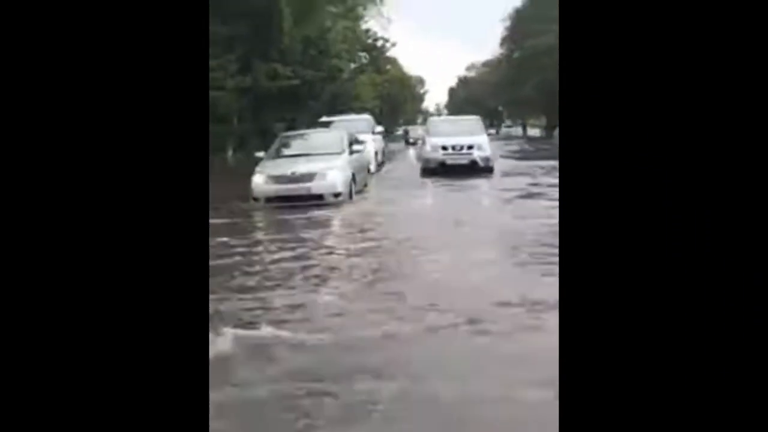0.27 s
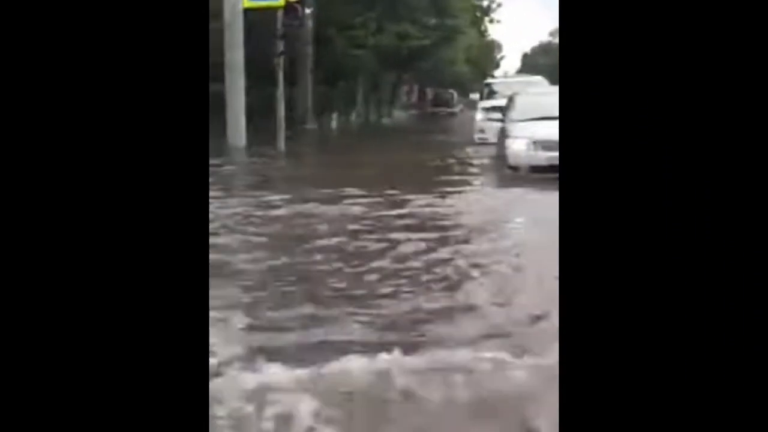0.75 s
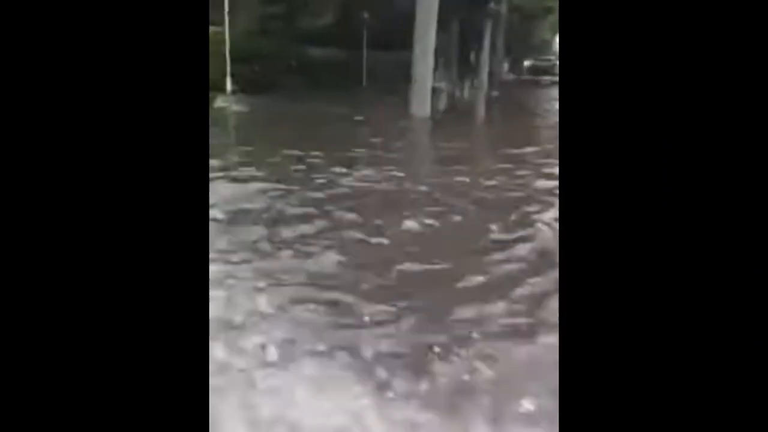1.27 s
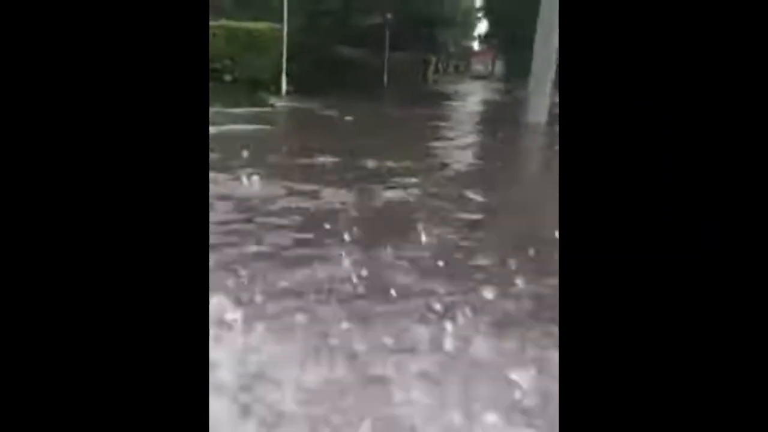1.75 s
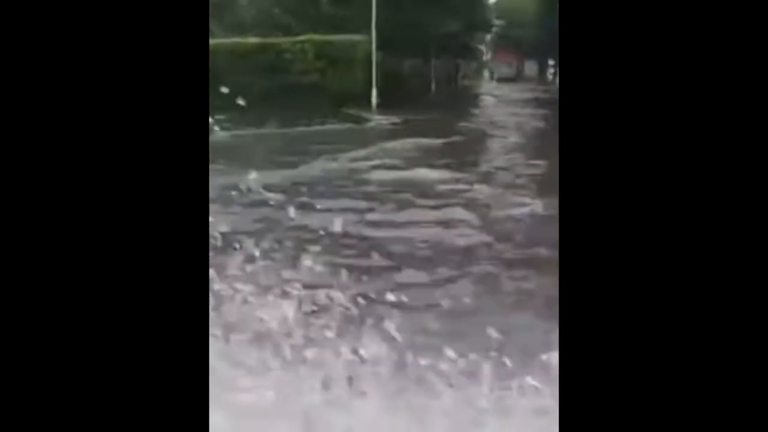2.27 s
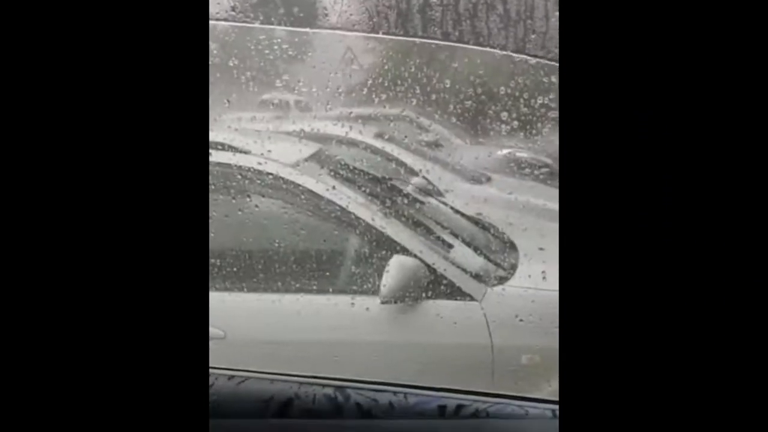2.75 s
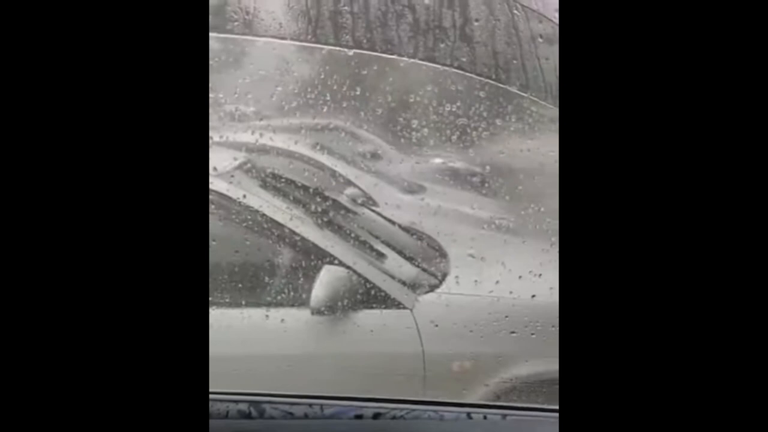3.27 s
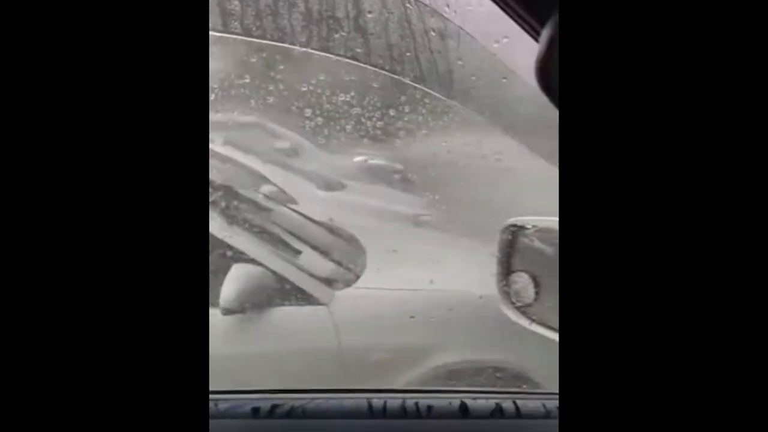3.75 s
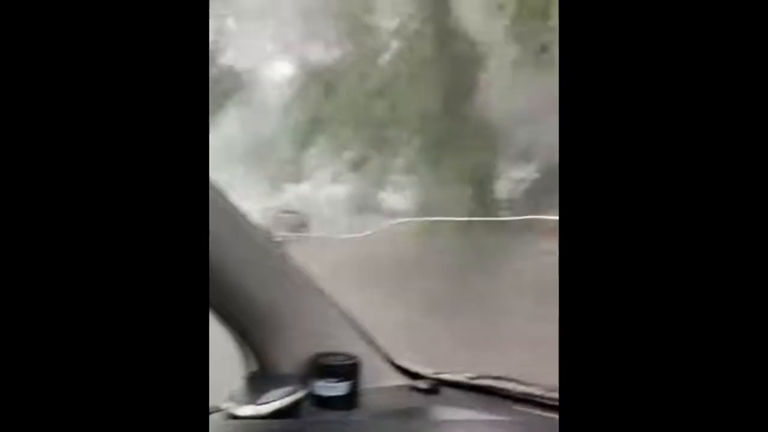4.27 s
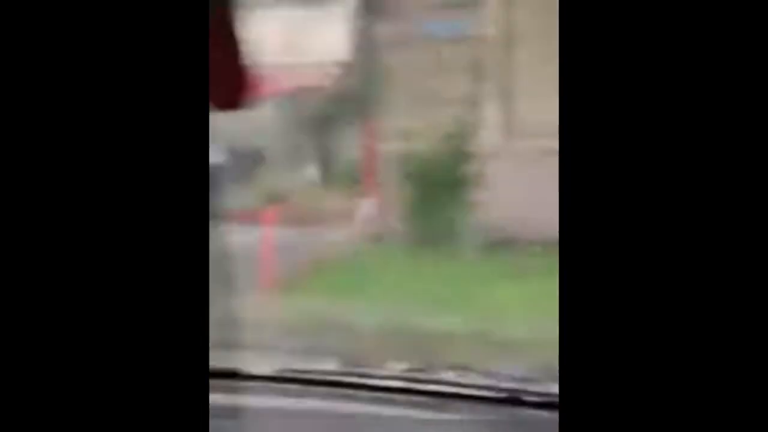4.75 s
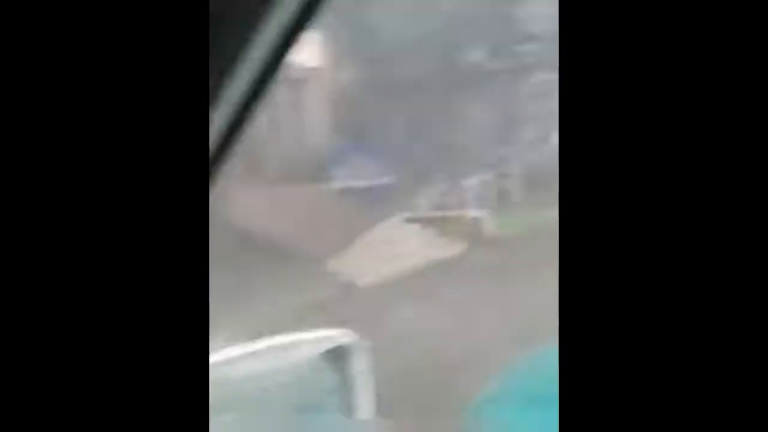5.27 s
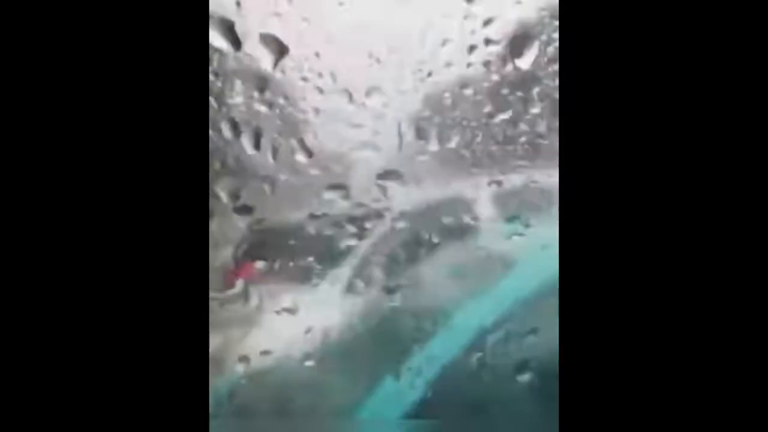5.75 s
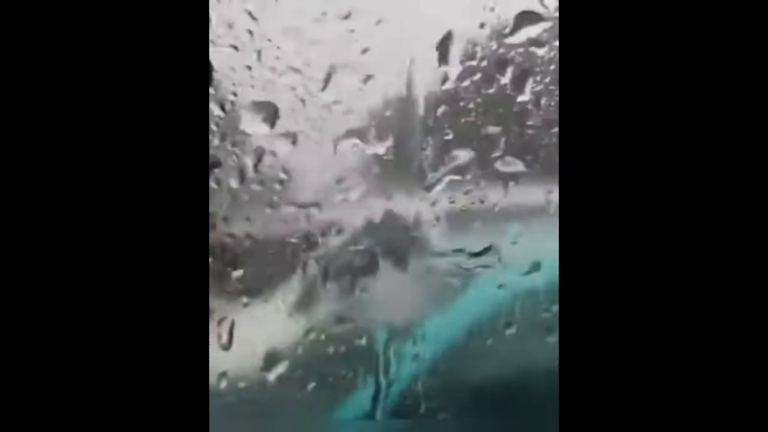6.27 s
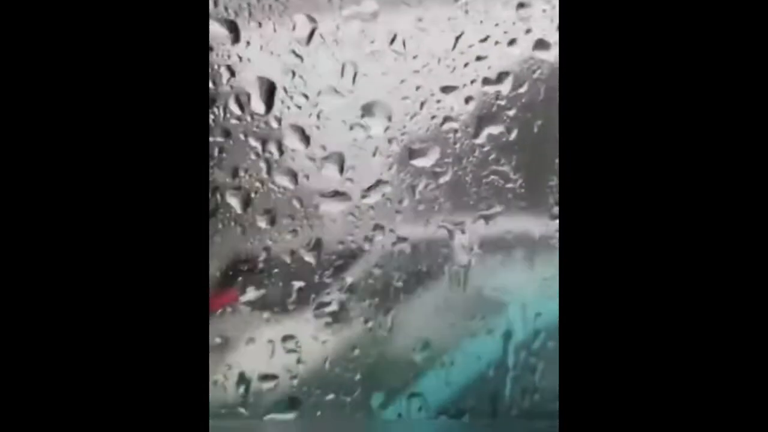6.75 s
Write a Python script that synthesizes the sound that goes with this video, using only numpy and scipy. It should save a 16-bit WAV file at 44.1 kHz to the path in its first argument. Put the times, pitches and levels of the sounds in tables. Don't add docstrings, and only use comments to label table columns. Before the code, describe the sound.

A car wades noisily through floodwater with low gusty thuds and spray, then suddenly soft dense rain hisses and drums around a car cabin.

```python
import sys
import numpy as np
from scipy import signal
from scipy.fft import rfft, irfft, dct, next_fast_len
from scipy.io import wavfile

SR = 44100
rng = np.random.default_rng(int(sys.argv[2]) if len(sys.argv) > 2 else 0)


def materialize(psi):
    bounded = np.clip(np.atleast_2d(psi).T, -1, 1)
    quanta = np.round(bounded * 32767).astype(np.int16)
    wavfile.write(sys.argv[1], SR, quanta)


def makeup_ratio(level_db):
    decades = np.asarray(level_db, float) / 20
    return 10 ** decades


N = 309141
SIZE = next_fast_len(N)
HZ = np.maximum(np.arange(SIZE // 2 + 1) * SR / SIZE, 1)
TIME = np.arange(N) / SR
CUT_S = 2.4108

# (time [s], peak level [dB], pitch [Hz])
THUMPS = [(0.045, -11, 107), (0.211, -15, 92), (0.315, -8, 137), (0.425, -2, 141), (0.509, -7, 245),
          (0.59, -4, 188), (0.609, -13, 134), (0.677, -9, 152), (0.706, -2.5, 159), (0.72, -16, 131),
          (0.767, -8, 164), (0.843, -10, 122), (0.873, -5, 134), (0.95, -6.5, 136), (0.97, -9.5, 156),
          (1.061, -6, 108), (1.08, -4, 177), (1.153, -5.5, 199), (1.22, -5, 164), (1.313, -9, 138),
          (1.387, -5.5, 125), (1.527, -8.5, 116), (1.648, -12, 283), (1.784, -5.5, 126), (1.867, -5.5, 185),
          (1.999, -15, 151), (2.225, -6, 127), (2.3, -5.5, 222), (2.39, -20, 170)]


def rms_one(x):
    return x / np.sqrt(np.mean(x ** 2) + 1e-20)


def in_time(rows):
    s, *columns = np.transpose(rows)
    return [np.interp(TIME, s, c) for c in columns]


def at_hz(points):
    hz, value = np.transpose(points)
    return np.interp(np.log(HZ), np.log(hz), value)


def stepped(edges, levels):
    corners = np.ravel([(a + 1, b) for a, b in zip(edges, edges[1:])])
    return np.interp(HZ, corners, np.ravel(levels), left=-200, right=-200)


def bumps(times, heights, width_s):
    coarse = TIME[::32]
    bells = np.exp(-0.5 * ((coarse[:, None] - np.asarray(times)) / width_s) ** 2)
    return np.interp(TIME, coarse, bells @ np.asarray(heights))


def drift(rate):
    r = np.exp(-80 * np.pi * rate / SR)
    chance = rng.standard_normal(N // 40 + 2002)
    slow = signal.lfilter([1], [1, -2 * r, r * r], chance)[2000:]
    return np.interp(np.arange(N) / 40, np.arange(len(slow)), rms_one(slow))


def droplets(per_s, spread_db, share):
    sizes = makeup_ratio(spread_db * np.minimum(rng.exponential(1, N), 5)) * rng.choice([-1, 1], N)
    clicks = rms_one(sizes * (rng.random(N) < per_s / SR))
    share = np.clip(share, 0, 1)
    return np.sqrt(share) * clicks + np.sqrt(1 - share) * rng.standard_normal(N)


def patches(spectra, low_hz, high_hz, count, shared_db, own_db, rate):
    edges = np.geomspace(low_hz, high_hz, count + 1)
    band = np.clip(np.searchsorted(edges, HZ), 1, count)
    together, out = drift(rate), 0
    for k in range(1, count + 1):
        flicker = makeup_ratio(shared_db * together + own_db * drift(rate))
        out = out + flicker * irfft(spectra * (band == k), SIZE)[..., :N]
    return rms_one(out)


def ring(clicks, hz, t60):
    r, w = makeup_ratio(-60 / (t60 * SR)), 2 * np.pi * hz / SR
    return signal.lfilter([0, np.sin(w)], [1, -2 * r * np.cos(w), r * r], clicks + 1e-18)


def wade_levels():
    # (time [s], height over the start [dB], depth of churn [dB])
    bow = [
        (0.0, 0, -0.5),
        (0.35, -0.5, 0),
        (0.75, -2, 0.9),
        (1.15, -1.5, -0.7),
        (1.5, 0.6, 1),
        (1.75, 3, -0.2),
        (2.1, 2.5, -0.7),
        (2.41, -1.5, -0.6),
    ]
    # (time [s], level over the steady spray [dB])
    splashes = [(0.07, 3), (0.3, 0.5), (0.84, 5.5), (0.93, 2), (1.03, 3), (1.3, 3.5), (1.38, 0.5),
                (1.53, 1.5), (1.64, 2.5), (1.69, 2.5), (1.83, -1), (1.96, 3.5), (2.09, 2.5), (2.2, 4),
                (2.3, 3), (2.38, 4.5)]
    bow_db, depth_db = in_time(bow)
    splash_db = bumps(*np.transpose(splashes), width_s=0.018)
    s, peak_db, _ = np.transpose(THUMPS)
    lull_db = -19.5 - 0.8 * TIME
    swell = bumps(s + 0.015, makeup_ratio(2 * (peak_db - 12.5)), width_s=0.026)
    wind_db = 10 * np.log10(makeup_ratio(2 * lull_db) + swell)
    churn_db = -20 + depth_db + 0.32 * splash_db + 0.33 * (wind_db - lull_db)
    spray_db = -25.5 + bow_db + splash_db
    mist_db = -41.8 + 1.4 * bow_db + 0.8 * splash_db
    fine_db = -64 + 3 * bow_db + splash_db
    return wind_db, churn_db, spray_db, mist_db, fine_db


def wind(level_db):
    # (frequency [Hz], density [dB])
    turbulence = [(15, -50), (25, -69), (43, -60), (81, 1), (129, 3.5), (330, -5), (430, -23), (730, -120)]
    noise = rfft(rng.standard_normal(N), SIZE) * makeup_ratio(at_hz(turbulence))
    out = makeup_ratio(level_db - 3.0) * patches(noise, 44, 400, count=3, shared_db=2.0, own_db=3.0, rate=60)
    for (s, peak_db, hz), turn in zip(THUMPS, rng.random(len(THUMPS))):
        cycles = np.arange(int(1.6 * SR / hz)) * hz / SR
        at = round(s * SR)
        eddy = np.hanning(len(cycles)) * np.cos(2 * np.pi * (cycles + turn))
        out[at:at + len(cycles)] += makeup_ratio(peak_db + 1.5) * eddy
    return signal.sosfilt(signal.butter(6, 66, "high", fs=SR, output="sos"), out)


def bubbles(per_s, cycles):
    born = droplets(per_s, spread_db=1.5, share=0.96)
    pitches, dealt = np.geomspace(300, 1900, 14), rng.integers(0, 14, N)
    out = 0
    for k, hz in enumerate(pitches):
        out = out + ring(born * (dealt == k), hz, cycles / hz) * np.sqrt(hz)
    return rms_one(out)


def wade():
    # (frequency [Hz], density [dB])
    churn_shape = [(160, 0), (280, 0), (832, -6), (1170, -12), (1610, -9.5), (1900, -16.5), (2470, -54),
                   (4180, -120)]
    spray_edges = [1700, 4750, 6120, 7670, 8520, 10050, 11590]
    # (level at lower edge [dB], level at upper edge [dB])
    spray_bands = [(-4, -3.5), (-12, -10), (-2.5, -0.8), (-5, -7), (-31, -31.5), (-38, -38)]
    mist_edges = [11590, 12920, 13950, 15680]
    # (level at lower edge [dB], level at upper edge [dB])
    mist_bands = [(-1, -5), (.2, -1.5), (-22, -20)]
    # (time [s], level [dB])
    sloshes = [
        (2.0, -33),
        (2.08, -30),
        (2.21, -29),
    ]

    wind_db, churn_db, spray_db, mist_db, fine_db = wade_levels()
    gusts = wind(wind_db)
    froth = 0.5 * bubbles(per_s=900, cycles=12.4) + 0.97 * rng.standard_normal(N)
    churn = patches(rfft(froth, SIZE) * makeup_ratio(at_hz(churn_shape)), 250, 2200,
                    count=5, shared_db=-0.06, own_db=0.3, rate=29.0)
    drops = rfft(droplets(per_s=5000, spread_db=2.5, share=0.22) * makeup_ratio(0.83 * drift(41)), SIZE)
    spray = patches(drops * makeup_ratio(stepped(spray_edges, spray_bands)), 1700, 11590,
                    count=6, shared_db=0.47, own_db=0.5, rate=36)
    mist = patches(drops * makeup_ratio(stepped(mist_edges, mist_bands)), 9500, 15400,
                   count=3, shared_db=1.0, own_db=0.0, rate=12)
    fine_shape = makeup_ratio(stepped(spray_edges[4:], [(3, -1.0), (0.0, -7.0)]))
    fine = rms_one(irfft(drops * fine_shape, SIZE)[:N])

    release = np.exp(-1 / (0.036 * SR))
    duck = 1 / (1 + 1.32 * signal.lfilter([1 - release], [1, -release], np.abs(gusts)))
    water = makeup_ratio(churn_db) * churn
    water = water + duck * (makeup_ratio(spray_db) * spray + makeup_ratio(mist_db) * mist + makeup_ratio(fine_db) * fine)
    s, slosh_db = np.transpose(sloshes)
    water = water + bumps(s, makeup_ratio(slosh_db), width_s=0.044) * rms_one(ring(froth, 1670, 0.0079))
    opening = np.clip(0.69 + TIME / 0.074, 0, 1)
    return (gusts + water) * (TIME < CUT_S) * opening


def two_ports(per_s, spread_db, share):
    # (frequency [Hz], likeness [0-1])
    likeness = [(90, 0.06), (130, 0.6), (180, 0.82), (430, 0.67), (600, 0.66), (900, 0.26), (1150, 0.59),
                (2000, 0)]
    # (frequency [Hz], level [dB])
    left_more = [(45, 7), (100, 27), (130, 15), (160, 10), (200, -1.5), (700, -0.5), (1600, -5), (3600, 0),
                 (5300, -12), (6500, -0.5), (9500, -11.5)]
    common, left, right = [rfft(droplets(per_s, spread_db, share), SIZE) for k in range(3)]
    alike, tilt = np.clip(at_hz(likeness), 0, 1), makeup_ratio(at_hz(left_more))
    lag = np.exp(-2j * np.pi * HZ * 0.00025)
    left = np.sqrt(alike) * common + np.sqrt(1 - alike) * left
    right = np.sqrt(alike) * common * lag + np.sqrt(1 - alike) * right
    return np.array([tilt * left, right]) / np.sqrt(1 + tilt ** 2) * (HZ < 11640)


def rain_levels():
    # (time [s], downpour over the start [dB], facing [-1 side glass to 1 windscreen])
    downpour = [(2.41, 0, 0.81), (2.9, 0.2, 1), (3.03, -0.4, -0.8), (3.2, -0.5, -0.42), (3.9, 1.5, -0.9),
                (4.2, 0.2, -0.67), (4.55, -2, -0.97), (4.85, -3.5, -0.65), (5.15, -2.5, -0.21),
                (5.25, -4.5, -0.4), (5.68, -4.3, -0.4), (5.8, -5, -0.054), (6.65, -4.5, 0.19),
                (7.0, -4.5, 0.41)]
    # (time [s], half width [s], extra rain [dB], roof hum [dB])
    squalls = [
        (5.38, 0.05, 2, -46),
        (5.6, 0.16, 2.2, -52),
        (5.8, 0.052, 1, -53),
        (6.05, 0.08, 6.5, -42),
        (6.21, 0.052, 4.5, -45),
        (6.31, 0.05, 6.5, -51),
        (6.55, 0.16, 5, -45),
        (6.93, 0.044, 0.8, -48),
    ]
    pour_db, turn = in_time(downpour)
    s, width_s, extra_db, hum_db = np.transpose(squalls)
    squall_db = bumps(s, extra_db, width_s)
    fling_db = bumps([3.04], [5], width_s=0.016)
    boom_db = -45.4 + 0.11 * pour_db + 0.36 * squall_db
    drum_db = -26.5 + pour_db + 0.44 * squall_db
    patter_db = -54 + 0.52 * pour_db + 4.5 * turn + squall_db
    hiss_db = -54.5 + 0.55 * pour_db - 3.5 * turn + fling_db
    sizzle_db = -78.5 - 2 * turn
    return boom_db, drum_db, patter_db, hiss_db, sizzle_db, squall_db, bumps(s, makeup_ratio(hum_db), width_s)


def rain():
    # (frequency [Hz], density [dB])
    boom_shape = [(24, -59), (40, -73), (91, -12.5), (166, -4.5), (204, -4), (238, 3), (280, -9.5),
                  (360, -12), (620, -120)]
    # (frequency [Hz], density [dB])
    drum_shape = [(140, -26), (230, -26.5), (270, -10.5), (360, -3), (409, -3.5), (475, -1), (679, -1.5),
                  (727, -2.5), (864, -1), (1320, -6), (1700, -6), (3600, -27.5), (4680, -60.5),
                  (7920, -120)]
    # (frequency [Hz], density [dB])
    patter_shape = [(2120, -32.5), (3600, -7), (4120, -2.5), (4740, -3.5), (5490, 1.5), (6400, -2.5),
                    (8320, -21.5), (14100, -120)]
    # (frequency [Hz], density [dB])
    hiss_shape = [(3710, -14), (6300, -5.5), (7270, 2), (9340, -15.5), (11200, -16.5), (11600, -14.5),
                  (15100, -47), (22000, -120)]

    boom_db, drum_db, patter_db, hiss_db, sizzle_db, squall_db, hum = rain_levels()
    roof = two_ports(per_s=1500, spread_db=2.5, share=0.34)
    glass = two_ports(per_s=3500, spread_db=4.0, share=0.28)
    boom = patches(roof * makeup_ratio(at_hz(boom_shape)), 60, 300, count=2, shared_db=0.8, own_db=1.5, rate=8)
    drum = patches(roof * makeup_ratio(at_hz(drum_shape)), 230, 4000, count=8, shared_db=0.59, own_db=1.24, rate=18)
    patter = patches(glass * makeup_ratio(at_hz(patter_shape)), 3700, 7300, count=4, shared_db=0.7, own_db=1.6, rate=9)
    hiss = patches(glass * makeup_ratio(at_hz(hiss_shape)), 5440, 11400, count=5, shared_db=0.3, own_db=1.6, rate=14)
    sizzle = rms_one(irfft(glass * (HZ > 8800), SIZE)[:, :N])
    panel = rms_one(ring(rng.standard_normal(N), hz=168, t60=0.22))
    rush = rms_one(irfft(glass * np.exp(-3.5 * np.log2(HZ / 1900) ** 2), SIZE)[:, :N])

    cabin = makeup_ratio(boom_db) * boom + makeup_ratio(drum_db) * drum + makeup_ratio(patter_db) * patter + makeup_ratio(hiss_db) * hiss
    cabin = cabin + hum * panel + makeup_ratio(sizzle_db) * sizzle
    cabin = cabin + makeup_ratio(-43) * (makeup_ratio(squall_db) - 1) * rush
    cabin = signal.sosfilt(signal.butter(2, 40, "high", fs=SR, output="sos"), cabin)
    return cabin * np.clip((TIME - CUT_S) / 0.028, 0, 1)


def scene():
    return wade() + rain()


def phone_rounding(x, follow, band_db, frame_db):
    # (frequency [Hz], step [dB])
    step_points = [(300, -62), (2000, -53), (2500, -44), (2900, -40), (3500, -37), (4100, -41), (4600, -42),
                   (5500, -39), (6400, -39), (7400, -41), (8500, -47), (9500, -53), (11500, -53),
                   (13500, -50), (14300, -45)]
    hop = 1024
    lead = 2 * hop - 626
    padded = np.pad(x, (lead, 3 * hop - (N + lead) % hop))
    window = signal.windows.kaiser_bessel_derived(2 * hop, 4 * np.pi)
    frames = np.lib.stride_tricks.sliding_window_view(padded, 2 * hop)[::hop] * window
    a, b, c, d = np.split(frames, 4, axis=1)
    lines = dct(np.hstack([-c[:, ::-1] - d, a - b[:, ::-1]]), type=4, norm="ortho")

    loud_db = 10 * np.log10(np.mean(lines ** 2, axis=1, keepdims=True) + 1e-9) + 31
    hz, step_db = np.transpose(step_points)
    wobble_db = band_db * rng.standard_normal((len(lines), hop // 8))
    wobble_db = wobble_db + frame_db * rng.standard_normal((len(lines), 1))
    usual_db = np.interp(np.arange(hop) * SR / (2 * hop), hz, step_db)
    step = makeup_ratio(usual_db + follow * loud_db + np.repeat(wobble_db, 8, axis=1))
    step[:, 650:] *= makeup_ratio(5 * rng.standard_normal((len(lines), 1)))
    kept = np.sign(lines) * step * np.floor(np.abs(lines) / step + 0.4)

    u, v = np.split(dct(kept, type=4, norm="ortho"), 2, axis=1)
    back = np.hstack([v, -v[:, ::-1], -u[:, ::-1], -u]) * window
    out = np.pad(back[:, :hop].ravel(), (0, hop)) + np.pad(back[:, hop:].ravel(), (hop, 0))
    return out[lead:lead + N]


def top_cut(x):
    return signal.sosfilt(signal.butter(12, 15730, fs=SR, output="sos"), x)


def record(dry):
    soft = 1.18 * np.tanh(dry / 1.233)
    left, right = signal.sosfilt(signal.butter(2, 45.0, "high", fs=SR, output="sos"), soft)
    mid = phone_rounding((left + right) / 2, follow=0.55, band_db=3.0, frame_db=0.9)
    side = phone_rounding((left - right) / 2, follow=0.55, band_db=3.0, frame_db=0.9)
    return top_cut(np.array([mid + side, mid - side]))


dry = scene()
out = record(dry)
materialize(out)
```